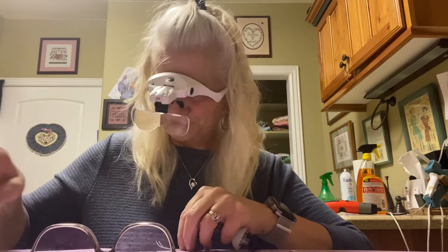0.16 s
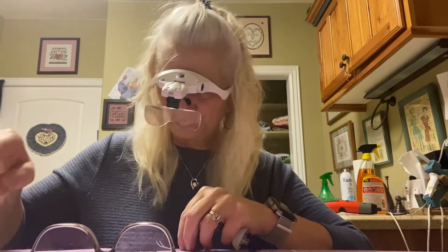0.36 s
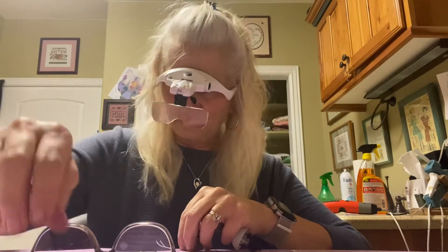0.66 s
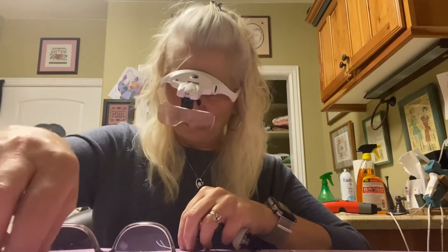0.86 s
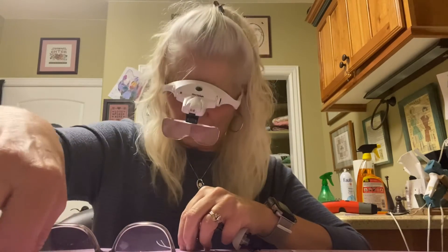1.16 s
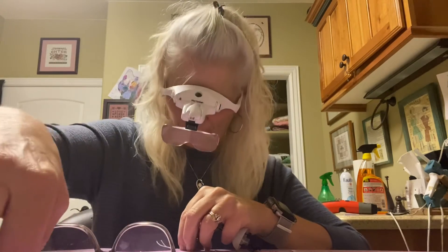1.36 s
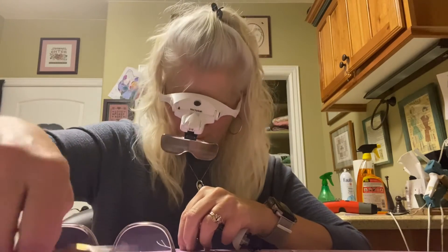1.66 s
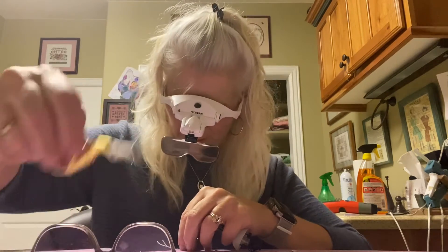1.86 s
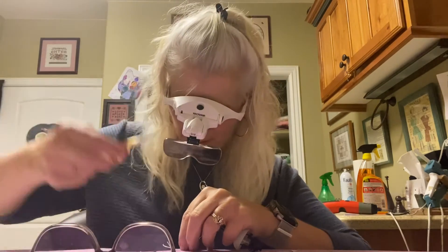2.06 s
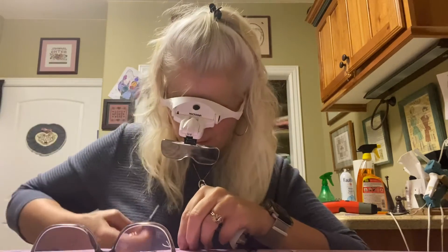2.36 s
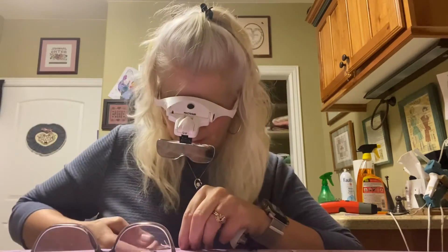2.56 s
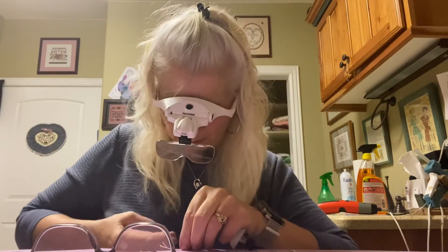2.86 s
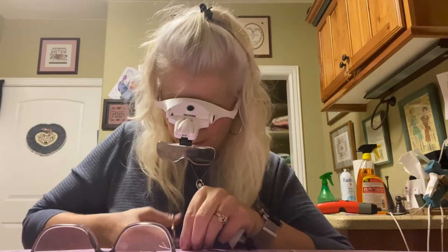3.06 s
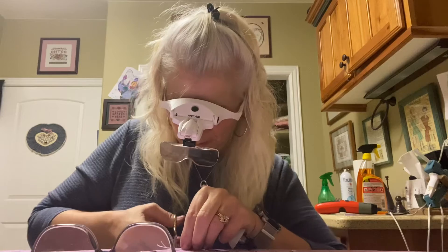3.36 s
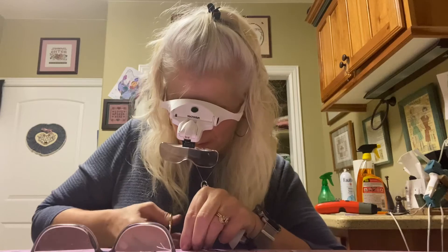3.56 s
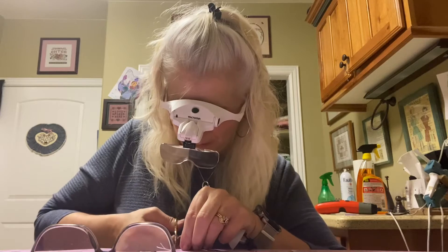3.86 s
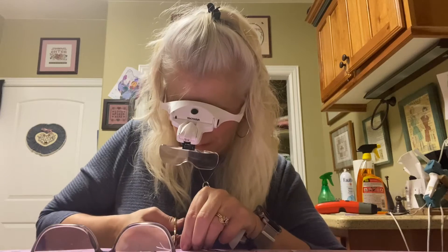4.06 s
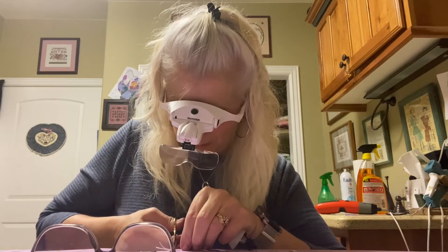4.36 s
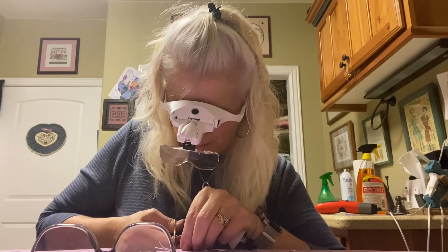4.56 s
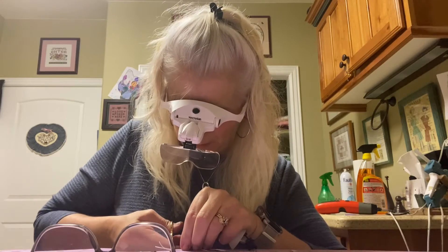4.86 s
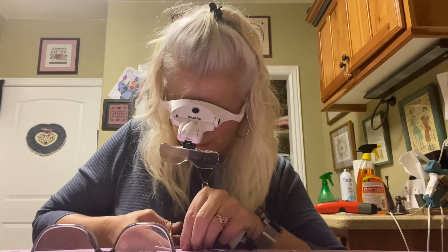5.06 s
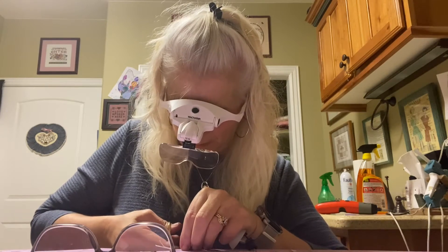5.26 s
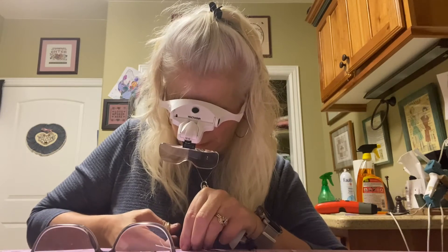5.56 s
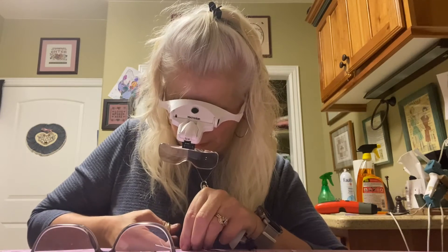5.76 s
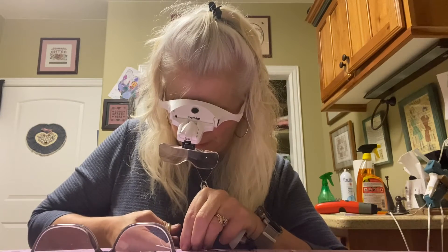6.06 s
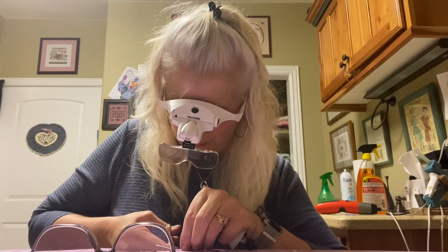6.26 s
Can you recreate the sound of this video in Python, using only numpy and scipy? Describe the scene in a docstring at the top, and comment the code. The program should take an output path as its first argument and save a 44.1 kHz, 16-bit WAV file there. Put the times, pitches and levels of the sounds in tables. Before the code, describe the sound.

Small steel cutters are picked from clattering tools on a wooden table in a quiet room, then wire is handled with soft knocks and scuffs.

```python
"""A quiet furnished room: small steel cutters are picked out of other tools on a wooden table and used on thin wire.
Contacts ring steel modes, burst into cracks of noise and knock table modes; each excites a short room tail.
Grainy noise is hands, sleeves and scuffs; swelling resonant noise is sleeve wipes and soft far knocks.
A wavering low drone comes and goes over rumble and airy hiss. Two close microphone ports hear it."""
import sys
import numpy as np
from scipy import signal
from scipy.fft import rfft, irfft, next_fast_len
from scipy.io import wavfile
from scipy.ndimage import uniform_filter1d

SR = 44100
rng = np.random.default_rng(int(sys.argv[2]) if len(sys.argv) > 2 else 0)


def generate_wav(signal):
    """Clip the signal to [-1, 1] and save it as 16-bit WAV at the path in sys.argv[1]."""
    frames = np.transpose(np.atleast_2d(signal))
    scaled = np.clip(frames, -1, 1) * 32767
    pcm = np.round(scaled).astype(np.int16)
    wavfile.write(sys.argv[1], SR, pcm)


N = 281975


def from_db(db):
    """dB to gain."""
    return 10 ** (np.asarray(db) / 20)


def rms_one(x):
    """Scales to rms 1."""
    return x / np.sqrt(np.mean(x ** 2) + 1e-20)


def in_time(rows):
    """Columns of a curve table, one value per sample."""
    s, *columns = np.transpose(rows)
    return [np.interp(np.arange(N) / SR, s, c) for c in columns]


def at_hz(points, hz):
    """Reads a spectrum on a log-frequency axis."""
    point_hz, values = np.array(points)[:, 0], np.array(points)[:, 1]
    return np.interp(np.log(hz), np.log(point_hz + 1), values)


def bandpass(x, order, low_hz, high_hz):
    """Butterworth band-pass."""
    return signal.sosfilt(signal.butter(order, [low_hz, high_hz], "band", fs=SR, output="sos"), x)


def drift(rate_hz):
    """Slow chance of spread 1: noise at SR / 40 through two one-poles at rate_hz."""
    step = 40
    r = np.exp(-2 * np.pi * rate_hz * step / SR)
    coarse = rng.standard_normal(N // step + 2002)
    slow = signal.lfilter([1], [1, -2 * r, r * r], coarse)[2000:]
    return np.interp(np.arange(N) / step, np.arange(len(slow)), rms_one(slow))


def ring(clicks, hz, t60_s):
    """Damped mode: a unit click starts a sine of height 1."""
    r, w = from_db(-60 / (t60_s * SR)), 2 * np.pi * hz / SR
    return signal.lfilter([0, np.sin(w)], [1, -2 * r * np.cos(w), r * r], clicks + 1e-18)


# left-right correlation of noise: (frequency [Hz], correlation [-1 to 1])
LIKENESS = [(60, 0.82), (130, 0.65), (290, 0.38), (640, -0.21), (1400, -0.16), (3000, 0.033), (6000, 0.45),
            (9000, 1), (15000, 1)]


def banded_noise(spectrum, patchy_db):
    """Half-octave bands of stereo noise, each with its own level, flicker and likeness; rms 1."""
    out, together = 0, drift(1.0)
    edges_hz = 24 * 2 ** np.arange(0, 9.6, .5)
    white = rng.standard_normal((2, 2, N))      # neighbouring bands get unrelated noise
    for k, (low_hz, high_hz) in enumerate(zip(edges_hz, edges_hz[1:])):
        hz = np.sqrt(low_hz * high_hz)
        if not spectrum[0][0] <= hz <= spectrum[-1][0]:
            continue
        mid, side = bandpass(white[k % 2], 2, low_hz, high_hz)
        alike = np.clip(at_hz(LIKENESS, hz), -1, 1)
        flicker_db = patchy_db * (together / 2 + drift(9.2))
        stereo = np.sqrt(1 + alike) * mid + np.sqrt(1 - alike) * side * [[1], [-1]]
        out = out + from_db(at_hz(spectrum, hz) + flicker_db) * stereo
    return rms_one(out)


def around(noise, hz, spread):
    """Stereo noise from hz / spread to hz * spread; likeness raised by 0.3, three draws."""
    alike = np.clip(at_hz(LIKENESS, hz) + 0.3, 0, 1)
    stereo = np.sqrt(alike) * noise[0] + np.sqrt(1 - alike) * noise[1:]
    return bandpass(stereo, 3, hz / spread, min(hz * spread, 16500))


# air spectrum, relative: (frequency [Hz], density [dB per Hz])
HISS = [(500, -4), (1500, 2), (4000, -3), (8500, -8), (11500, -3), (14000, -10.5), (16000, -9.5)]
HISS_DB = -86


def air():
    """Air of the room: steady broadband hiss with slight flicker."""
    return from_db(HISS_DB) * banded_noise(HISS, patchy_db=0.66)


# rumble spectrum, relative: (frequency [Hz], density [dB per Hz])
RUMBLE = [(15, -56), (25, -30.5), (48, -3.5), (81, -10.5), (94, -2), (113, -4), (156, -21), (279, -24.5),
          (400, -38), (520, -73), (880, -120)]
RUMBLE_DB = -64


def rumble():
    """Low patchy noise of the room."""
    return from_db(RUMBLE_DB) * banded_noise(RUMBLE, patchy_db=4.0)


# room decay: (frequency [Hz], t60 [s])
ROOM = [(180, 0.3), (360, 0.2), (1000, 0.28), (3000, 0.17), (6000, 0.17), (11000, 0.033), (15000, 0.08)]
ROOM_DB = -13


def room(x):
    """Diffuse tail: octave bands of noise, each dying at its own rate, after a 1.4 ms build-up."""
    t, tail = np.arange(SR // 2) / SR, 0
    for hz in 180 * 2. ** np.arange(7):
        noise = rng.standard_normal((2, len(t)))
        band = bandpass(noise, 2, hz / np.sqrt(2), min(hz * np.sqrt(2), 17000))
        tail = tail + band * from_db(-60 * t / at_hz(ROOM, hz))
    tail = tail * np.clip(t / 0.0014, 0, 1)
    unit_tail = tail / np.sqrt(np.sum(tail ** 2) / 2)
    return from_db(ROOM_DB) * signal.fftconvolve(x, unit_tail, axes=1)[:, :N]


# perhaps an engine idling outside: (time [s], fundamental [Hz], level before partial weights [dB])
DRONE = [(0, 56.7, -80), (2.05, 54, -70), (2.27, 53.3, -55), (2.42, 50.04, -53.5), (2.5, 46.8, -57),
         (2.6, 46.4, -51.5), (2.7, 46.3, -78), (3.07, 48.7, -57.5), (3.4, 52.9, -67), (3.8, 48.54, -67),
         (4.1, 56.7, -56), (4.28, 47.23, -71.5), (4.5, 48.53, -53.5), (4.71, 49.02, -46.5),
         (4.83, 51.8, -53), (5.14, 52.23, -51.5), (6.13, 52.1, -54), (6.39, 52, -65.5)]
# partials: (multiple of the fundamental, relative level [dB])
DRONE_ORDERS = [(1, -1), (2, -15), (2.5, -14.5)]
DRONE_WAVER_DB = 3.5


def drone():
    """A few low partials of one gliding pitch, wavering separately, louder on the right."""
    out, (hz, db) = 0, in_time(DRONE)
    phase = 2 * np.pi * np.cumsum(hz) / SR
    for multiple, order_db in DRONE_ORDERS:
        waver_db = DRONE_WAVER_DB * drift(4.6)
        out = out + np.sqrt(2) * from_db(db + order_db + waver_db) * np.sin(multiple * phase)
    return out * from_db([[-2.5], [2.0]])


def swells(events, modes):
    """Gaussian swells of noise in resonances; each mode has unit rms before its level."""
    t, out = np.arange(N) / SR, 0
    swell = sum(from_db(db) * np.exp(-((t - s) / length_s * 2) ** 2) for s, length_s, db in events)
    for hz, width_hz, db in modes:
        t60_s = np.log(1000) / np.pi / width_hz
        out = out + from_db(db) * rms_one(ring(rng.standard_normal((2, N)), hz, t60_s))
    return swell * out


# knocks: (middle [s], length [s], level before mode weights [dB])
FAR_KNOCKS = [(0.109, 0.057, -78.5), (5.129, 0.093, -80), (6.124, 0.11, -76.5)]
# hollow colour: (frequency [Hz], width [Hz], level [dB])
FAR_MODES = [(701, 44, 10), (881, 26, 5.5), (980, 26, 5)]


def far_knocks():
    """Soft far knocks: blurred swells in narrow hollow resonances."""
    return swells(FAR_KNOCKS, FAR_MODES)


# wipes: (middle [s], length [s], level before mode weights [dB])
STROKES = [(2.232, 0.062, -64), (2.378, 0.07, -66.5), (2.465, 0.056, -66), (2.615, 0.053, -66.5)]
# hollow colour: (frequency [Hz], width [Hz], level [dB])
STROKE_MODES = [(934, 99, 0), (1730, 140, -11.5), (2650, 260, -14), (3310, 380, -14.5)]


def sleeve_wipes():
    """A sleeve wipes over the table: swells in broad hollow resonances."""
    return swells(STROKES, STROKE_MODES)


# tool handles and bits lying about: (frequency [Hz], width [Hz], peak gain [dB])
HANDLES = [(182, 30, -2), (303, 19, -2.5), (466.6, 35, -3), (660, 90, -4), (951, 80, -1),
           (1176.6, 150, -10), (1470, 130, -10), (1750, 170, -3.5), (2650, 290, -5), (2980, 83, -8),
           (3420, 460, -6), (4428, 280, -11), (5220, 298.4, -10.5), (7370, 1000, -8)]


def handles(x, direct_db):
    """Colours friction and cracks by broad resonances of the things touched, beside the direct sound."""
    out = x * from_db(direct_db)
    for hz, width_hz, db in HANDLES:
        r = np.exp(-np.pi * width_hz / SR)
        zeros = (1 - r * r) / 2 * np.array([1, 0, -1])
        poles = [1, -2 * r * np.cos(2 * np.pi * hz / SR), r * r]
        out = out + from_db(db) * signal.lfilter(zeros, poles, x)
    return out


# rubbing spectrum, relative: (frequency [Hz], density [dB per Hz])
RUB = [(350, -35.5), (600, -4.5), (906, -7.5), (1130, -19.5), (1750, -13), (2150, -25), (2720, -17),
       (6730, -28), (9110, -25.5), (12200, -23.5), (16000, -69)]
TICKS_PER_S, TICK_DB, TICK_T60_S = 400, -12, 0.0077


def rubbing(db):
    """Skin, cloth and wire slide: noise made grainy by many small slips and scattered catches."""
    slips = rms_one(from_db(3.0 * drift(140.0)))
    catches = rng.random(N) < TICKS_PER_S / SR
    sizes = from_db(6.9 * np.minimum(rng.exponential(1, N), 3)) * catches
    ticks = rms_one(signal.lfilter([1], [1, -from_db(-60 / (TICK_T60_S * SR))], sizes))
    return from_db(db) * banded_noise(RUB, patchy_db=3.0) * (slips + from_db(TICK_DB) * ticks)


# hands and sleeves: (time [s], rubbing level before grain and colouring [dB], shuffling level [dB])
HANDS = [(0.0, -83, -73.5), (0.66, -91.5, -72.5), (0.85, -71.5, -62.5), (0.975, -62.5, -59),
         (1.0, -67, -63), (1.06, -63, -54), (1.09, -55, -51.5), (1.13, -59.5, -55), (1.165, -57, -57.5),
         (1.21, -53, -50), (1.28, -72, -65.5), (1.34, -70, -69), (1.49, -54, -69), (1.53, -64, -53),
         (1.59, -65.5, -49.5), (1.63, -75, -64.5), (1.8, -71, -61), (2.26, -83.5, -56), (2.53, -74.5, -60),
         (2.8, -80, -68.5), (3.1, -87, -59), (4.1, -92.5, -60.5), (4.34, -97.5, -65.5), (4.54, -100, -60),
         (6.39, -89, -71)]
# shuffling spectrum, relative: (frequency [Hz], density [dB per Hz])
SHUFFLE = [(41, -43), (70, -5.5), (85, -11), (118, -2), (210, -9), (288, -0.5), (324, -10.5), (512, -11.5),
           (720, -22), (779, -41.5), (1600, -49.5), (2080, -84), (3520, -120)]


def hands():
    """Rubbing coloured by the handles, plus dull patchy shuffling through the table."""
    rub_db, shuffle_db = in_time(HANDS)
    shuffling = from_db(shuffle_db) * banded_noise(SHUFFLE, patchy_db=3.5)
    return handles(rubbing(rub_db), direct_db=-5.5) + shuffling


# tool, hand or sleeve; levels before grain, envelope and colouring:
# (middle [s], length [s], level [dB], centre [Hz], bright edge level [dB])
SCUFFS = [(0.856, 0.061, -60.5, 1720, -70), (0.982, 0.015, -53.5, 3460, -46.5),
          (1.134, 0.04, -53.5, 940, -53), (1.076, 0.021, -40.5, 1670, -81.5), (1.235, 0.12, -64, 3073, -56),
          (1.544, 0.019, -49, 220, -82), (1.406, 0.035, -46, 183, -68), (1.565, 0.024, -44, 490, -87),
          (1.595, 0.028, -62.5, 450, -77), (1.584, 0.068, -71, 3200, -58),
          (1.568, 0.028, -50.5, 1500, -57.5), (2.107, 0.064, -61, 695, -101),
          (2.215, 0.021, -76, 4950, -63.5), (2.233, 0.065, -50.5, 318, -101),
          (2.594, 0.16, -74.5, 5470, -92.5), (2.752, 0.092, -80, 3920, -67.5),
          (2.93, 0.028, -75, 3500, -96.5), (3.034, 0.029, -68.5, 7000, -66.5),
          (3.09, 0.017, -50.5, 850, -96), (3.116, 0.045, -51, 2315, -79.5),
          (3.182, 0.074, -70.5, 2870, -92), (3.387, 0.04, -67.5, 1370, -72),
          (3.858, 0.0093, -59, 2450, -103.5), (3.869, 0.0069, -58.5, 2800, -98),
          (3.876, 0.0098, -60.5, 1900, -100), (4.039, 0.012, -62, 3000, -87.5),
          (4.054, 0.034, -54.5, 2800, -75), (4.078, 0.02, -62.5, 1900, -83.5),
          (4.092, 0.1, -57.5, 597, -92.5), (4.418, 0.018, -65, 1480, -97), (4.408, 0.013, -71.5, 2650, -94),
          (4.44, 0.02, -76.5, 2600, -95.5), (4.482, 0.028, -75.5, 2676, -93.5)]


def scuffs():
    """Short slides: grainy noise swelling around its middle, with a bright edge where steel is touched."""
    out, t = np.zeros((2, N)), np.arange(-4096, 4096) / SR
    draws = rng.standard_normal((len(SCUFFS), 7, len(t)))
    for (s, length_s, db, hz, edge_db), noise in zip(SCUFFS, draws):
        grain = from_db(1.3 * rms_one(uniform_filter1d(noise[6], size=70)))
        slide = from_db(db) * rms_one(around(noise[:3], hz, spread=1.55))
        edge = from_db(edge_db) * rms_one(around(noise[3:6], 11500, spread=1.3))
        swell = np.exp(-np.abs(t / length_s * 2) ** 3)
        at = round(s * SR) - len(t) // 2
        out[:, at:at + len(t)] += (slide + edge) * grain * swell
    return handles(out, direct_db=-16.0)


# blows; levels before mode weights and colouring, left minus right for crack and table:
# (time [s], crack level [dB], crack centre [Hz], snap level [dB], steel ring level [dB],
#  table thump level [dB], table knock level [dB], knock centre [Hz], left minus right [dB])
CONTACTS = [(0.3085, -85, 1800, -90, -92, -83, -62, 650, 0.5),
            (0.766, -74, 1800, -92, -98, -54, -70.5, 313, 1.5),
            (0.816, -62, 1200, -84, -95, -56.5, -57.5, 804, 4),
            (0.8823, -36.5, 1900, -38.5, -32, -53.5, -50.5, 970, -1),
            (0.9106, -44, 1710, -36.5, -39, -50, -83, 360, 3),
            (0.954, -58, 2210, -71, -69, -49.5, -65, 654, 4),
            (1.0286, -46, 2620, -82, -88, -54, -53, 490, -0.5),
            (1.0713, -30, 2250, -33, -60.5, -43.5, -38.5, 800, 2),
            (1.142, -33.5, 1610, -36, -17.5, -49.5, -32.5, 810, 0.5),
            (1.15, -33.5, 2900, -33, -32, -62, -58, 883, -2),
            (1.1623, -41, 1500, -63, -50, -53, -46.5, 895, 4),
            (1.187, -32, 2180, -24, -39.5, -69, -35, 880, 1),
            (1.2054, -38.5, 1740, -39, -49, -48, -55, 763, 0),
            (1.2125, -57, 2490, -38.5, -48.5, -59, -68, 297, 0),
            (1.345, -52, 1800, -59, -66, -80, -61, 309, 3.5),
            (1.3557, -39, 1730, -37.5, -58, -68, -46, 1090, 1),
            (1.3686, -39, 1820, -38, -64, -57.5, -42, 1150, 3),
            (1.4246, -37, 2090, -44.5, -77, -44.5, -43, 833, -4.5),
            (1.4436, -47, 1790, -70, -71, -68, -66.5, 665, -2.5),
            (1.4554, -75, 1800, -61, -61, -52, -74.5, 651, 15),
            (1.4733, -37.5, 2260, -42, -63, -34, -32.5, 423, 0),
            (1.496, -39, 1610, -53, -62, -61.5, -54.5, 900, -2),
            (1.5089, -40.5, 2320, -71, -70.5, -55, -64.5, 307.5, 2),
            (1.7028, -19, 2400, -33, -37, -24.5, -21, 842, 1.8),
            (1.706, -35, 1890, -31.5, -53, -44, -33, 296, -13.5),
            (1.7126, -34, 1570, -38.5, -60.5, -43, -42.5, 446, 5.5),
            (1.7228, -47, 1785, -51, -62.5, -49.5, -52, 750, 2),
            (1.733, -48.5, 1800, -50.5, -69, -44, -41, 402, 4),
            (1.7439, -40, 1830, -58, -68, -48, -66, 650, 9),
            (1.7546, -42.5, 2760, -53, -70, -44, -60, 442, -6),
            (1.768, -49, 1100, -63, -74, -58, -43.5, 560, -5),
            (1.939, -38.5, 2475, -50, -72.5, -59.5, -53.5, 299, -1),
            (1.976, -50.5, 1770, -49.5, -58.5, -72, -54, 305, 2),
            (2.1977, -66, 1810, -86, -67, -63.5, -61.5, 700, -5),
            (2.3108, -66, 3230, -54.5, -63, -65, -75, 297, -1.5),
            (2.503, -59, 3354, -63.5, -75, -72, -75.5, 443.4, -3.5),
            (2.7236, -79, 1820, -61, -58.5, -55.5, -65.5, 347, 1.9),
            (3.0958, -33.5, 2250, -56, -72, -43.5, -23, 518, -3),
            (3.1, -58.5, 2600, -73.5, -87, -50, -27, 647, 6.5),
            (3.1164, -57, 2630, -56.5, -87, -51, -30.5, 608, -3.5),
            (3.123, -42.5, 2307, -65, -75, -50.5, -29, 626, -2.5),
            (3.138, -61, 2600, -66, -88.5, -54, -48, 463, -1.5),
            (3.172, -66.5, 2000, -86, -88, -48.5, -51.5, 695, 0.8),
            (3.2202, -74.5, 2030, -84, -97, -52.5, -53, 398, 5.5),
            (3.3034, -64, 3530, -59.5, -53, -67, -77, 374, 1.5),
            (3.32, -62.5, 3470, -50.5, -54, -73, -79.5, 592, 2.5),
            (3.3715, -59.5, 3000, -79.5, -89.5, -57.5, -49.5, 446, -1.5),
            (3.3623, -51.5, 1486, -67, -78.5, -54.5, -49.5, 703, -5),
            (3.8011, -51, 1915, -69, -91, -55, -53.5, 396.4, -3.5),
            (3.8101, -57.5, 2590, -84.5, -89, -54, -60.5, 404, 3),
            (3.9411, -53, 1904, -54.5, -70, -70.5, -57, 568, -4.5),
            (3.9735, -67.5, 2627, -86, -93, -69.5, -72, 500, 0.1),
            (4.3917, -49.5, 2300, -58, -81.5, -52, -50, 880, 2),
            (4.468, -62.5, 2538, -55.5, -74.5, -58, -55, 455, -6),
            (4.5838, -68, 1592, -84.5, -89.5, -60, -60, 893, 6.5)]


def strikes(gains, lag_s=0, delay_s=0):
    """One click per contact in each channel, the right one lag_s later."""
    clicks, s = np.zeros((2, N)), np.array(CONTACTS)[:, 0] + delay_s
    clicks[0, np.round(s * SR).astype(int)] = gains[:, 0]
    clicks[1, np.round((s + lag_s) * SR).astype(int)] = gains[:, 1]
    return clicks


# table top modes: (frequency [Hz], relative level [dB], t60 [s])
TABLE = [(116, -5.5, .06), (143, -0.5, 0.026), (183.4, 5.5, 0.033), (227.2, 0, 0.03), (286.9, -0.5, 0.083),
         (330, 1, 0.035), (440.4, 0, .05), (539, -2, 0.041), (599.8, -2.5, 0.048), (638, -7.5, 0.08),
         (706.4, -5, 0.045), (775.7, 0, 0.028), (858, -5, .04), (980, -3, 0.027), (1085, 4, 0.0063),
         (1330, -5, 0.028), (1630, -1, 0.023), (1910, -9, 0.025)]
# stereo lean of the table: (frequency [Hz], left minus right [dB])
SIDES = [(60, -2), (180, -8.5), (550, 2.5), (1650, 4), (4970, -9), (15000, 0.0)]
TABLE_LAG_S, THUMP_TOP_HZ = 0.00054, 300
BENDING_S = .0055   # travel = BENDING_S * (sqrt(300 / hz) - 0.55), at least 0: lows arrive later
# lower modes have a close, weaker neighbour that rings longer
LINGER_DB, LINGER_TIMES, LINGER_APART, LINGER_TOP_HZ = -17, 3.5, 1.012, 1030


def table_top():
    """Low modes thump, higher ones knock, most near the knock centre; bending waves bring the highs first."""
    *_, thump_db, knock_db, centre_hz, pan_db = np.transpose(CONTACTS)
    turn, out = rng.uniform(-1, 1, (len(CONTACTS), len(TABLE), 4)), 0
    for k, (hz, db, t60_s) in enumerate(TABLE):
        low = hz < THUMP_TOP_HZ
        level_db = thump_db if low else knock_db - 9.8 * np.abs(np.log2(hz / centre_hz))
        # long waves mostly reach both ports in step
        opposed = turn[:, k, :1] > 1 - min(hz / 900, .8)
        # every blow pushes a low mode alike, neighbours opposed
        push = (-1) ** (k + 1) if low else np.sign(turn[:, k, 1:2])
        ports = push * np.where(opposed, [1, -1], [1, 1]) * from_db(2.5 * turn[:, k, 2:])
        lean = from_db((at_hz(SIDES, hz) + pan_db[:, None]) / 2 * np.array([1, -1]))
        travel_s = max(BENDING_S * (np.sqrt(300 / hz) - .55), 0)
        blows = strikes(from_db(level_db + db)[:, None] * ports * lean, TABLE_LAG_S, travel_s)
        out = out + ring(blows, hz, t60_s)
        if hz < LINGER_TOP_HZ:
            out = out + from_db(LINGER_DB) * ring(blows, hz * LINGER_APART, t60_s * LINGER_TIMES)
    return bandpass(out, 3, 85, 2400)      # wood yields: a soft contact


CRACK_T60_S = 0.014
SNAP_HZ, SNAP_T60_S = 5060, 0.00792
EDGE_HZ, EDGE_T60_S, EDGE_OVER_RING_DB = 10000, 0.0092, 4


def cracks():
    """Bursts of tiny fractures: a crack, a brighter snap and the edge of the steel, dying in milliseconds."""
    out, t = np.zeros((2, N)), np.arange(2048) / SR
    rise = np.minimum(t / .0003, 1)

    def burst(noise, db, hz, t60_s, spread):
        """Decaying noise shaped before its band filter."""
        shape = rise * from_db(-60 * t / t60_s)
        band = rms_one(around(noise * shape, hz, spread))
        return from_db(db) * band * np.sqrt(np.mean(shape ** 2))

    draws = rng.standard_normal((len(CONTACTS), 9, len(t)))
    for (s, db, hz, snap_db, steel_db, *_, pan_db), noise in zip(CONTACTS, draws):
        lean = from_db([[pan_db / 2], [-pan_db / 2]])
        crack = burst(noise[:3], db, hz, CRACK_T60_S, spread=1.544) * lean
        snap = burst(noise[3:6], snap_db, SNAP_HZ, SNAP_T60_S, spread=1.45)
        edge = burst(noise[6:], steel_db + EDGE_OVER_RING_DB, EDGE_HZ, EDGE_T60_S, spread=1.207)
        at = round(s * SR)
        out[:, at:at + len(t)] += crack + snap + edge
    return handles(out, direct_db=-7.5)


# jaws of the cutters: (frequency [Hz], relative level [dB], t60 [s])
STEEL = [(9750, -12.5, .012), (10410, 0.5, 0.022), (10700, -12, 0.023), (10986, -7.5, 0.025),
         (11326, -3, 0.021), (11640, -7, 0.022), (12000, -13, 0.008), (12800, -9, 0.0099),
         (13600, -10, .025), (14060, -19.5, 0.011), (14970, -16, 0.01497), (15800, -5, .02)]


def steel():
    """The hard jaws ring high and briefly; each contact shares its force anew among the modes."""
    level_db, out, blow_t60_s = np.array(CONTACTS)[:, 4], 0, .003
    share = rng.standard_normal((len(CONTACTS), len(STEEL), 2))
    for k, (hz, db, t60_s) in enumerate(STEEL):
        gains = from_db(level_db + db + 1.3 * share[:, k, 0]) * np.sign(share[:, k, 1])
        # the blow lasts a moment, so the ring swells
        blow = ring(strikes(gains[:, None] * [1, 1]), hz, blow_t60_s)
        out = out + ring(blow, hz, t60_s) * 2 * np.log(1000) / (blow_t60_s * SR)
    return out


def scene():
    """Air, rumble, drone, knocks, wipes and hands, under contacts and scuffs with their room."""
    background = air() + rumble() + drone() + far_knocks()
    handling = sleeve_wipes() + hands()
    hits = scuffs() + table_top() + cracks() + steel()
    return background + handling + hits + room(hits)


RIGHT_LAG_S, CUTOFF_HZ = .000167, 16700


def record(dry):
    """The right port hears everything a little later; the deepest bass and the top are cut."""
    size = next_fast_len(N + 64)
    hz = np.arange(size // 2 + 1) * SR / size
    late = np.exp(-2j * np.pi * hz * RIGHT_LAG_S)
    pair = np.array([dry[0], irfft(rfft(dry[1], size) * late, size)[:N]])
    pair = signal.sosfilt(signal.butter(4, 38, "high", fs=SR, output="sos"), pair)
    return signal.sosfilt(signal.cheby2(12, 70, CUTOFF_HZ, fs=SR, output="sos"), pair)


dry = scene()
out = record(dry)
generate_wav(out)
```